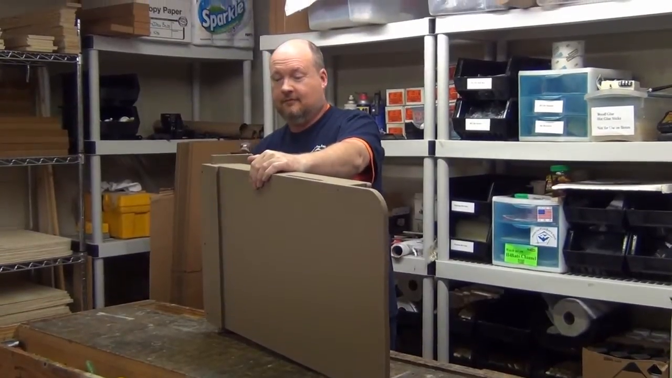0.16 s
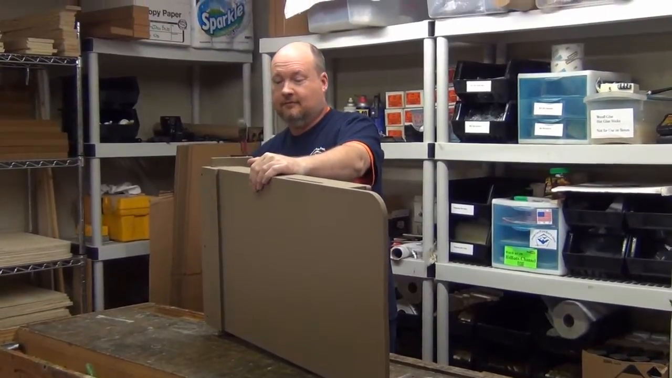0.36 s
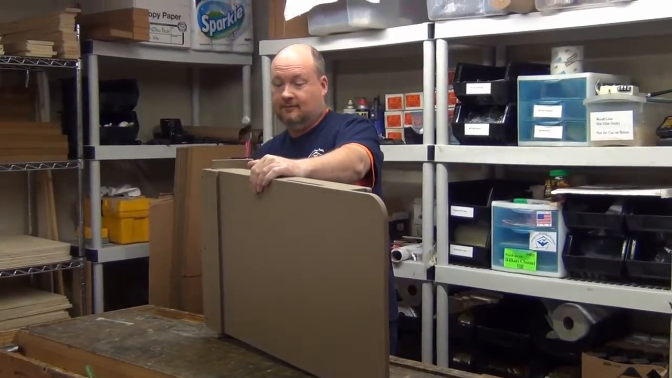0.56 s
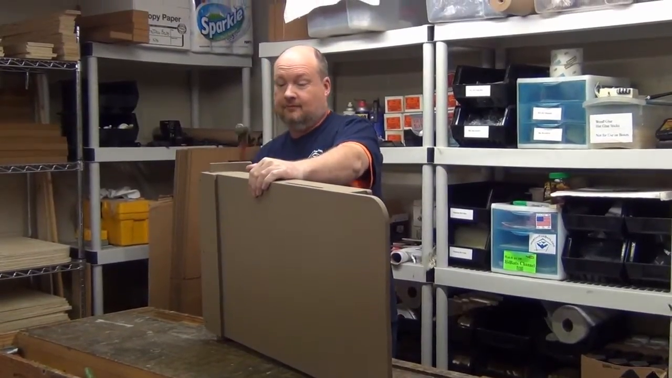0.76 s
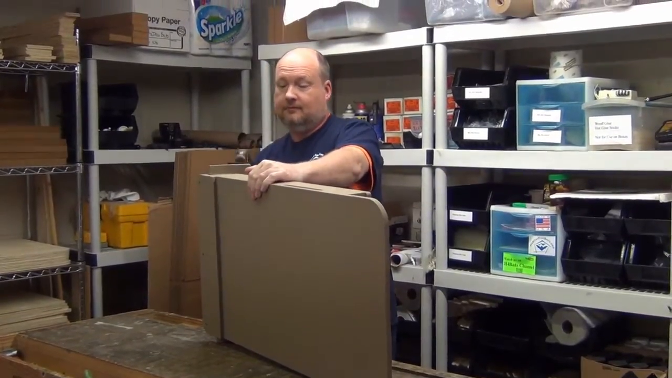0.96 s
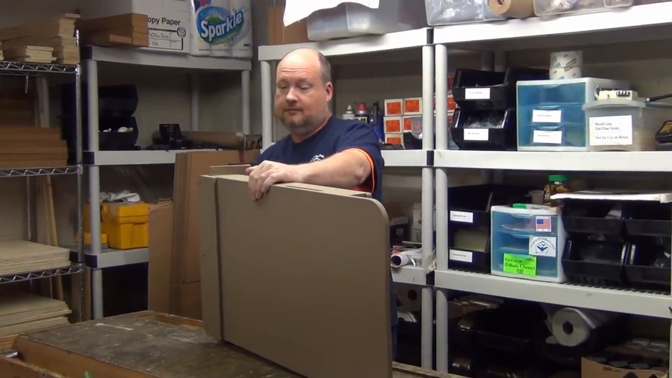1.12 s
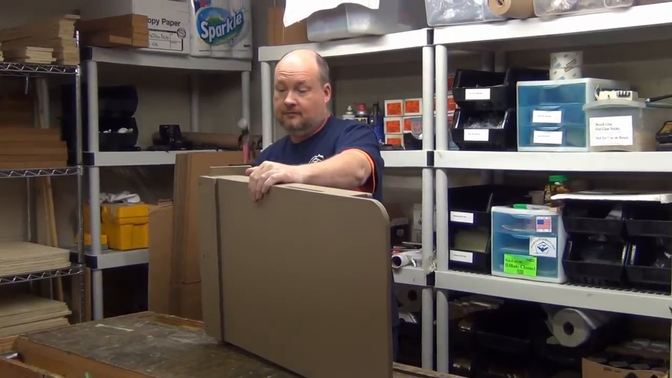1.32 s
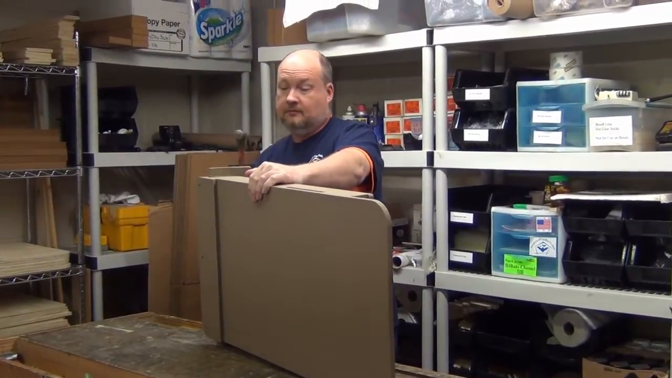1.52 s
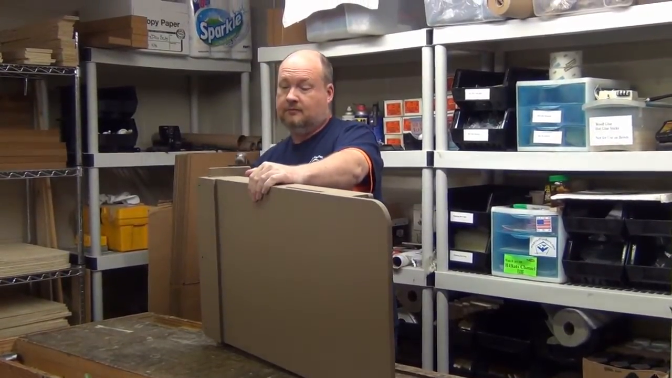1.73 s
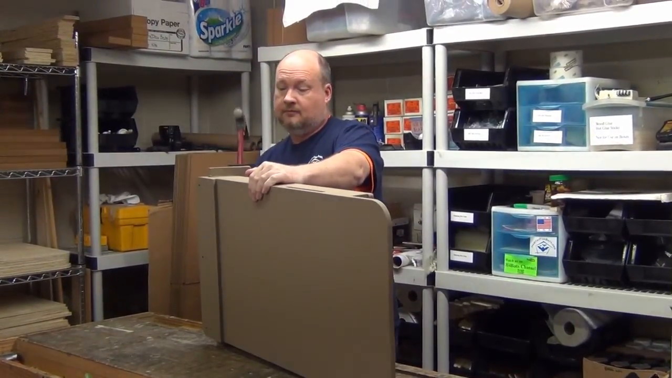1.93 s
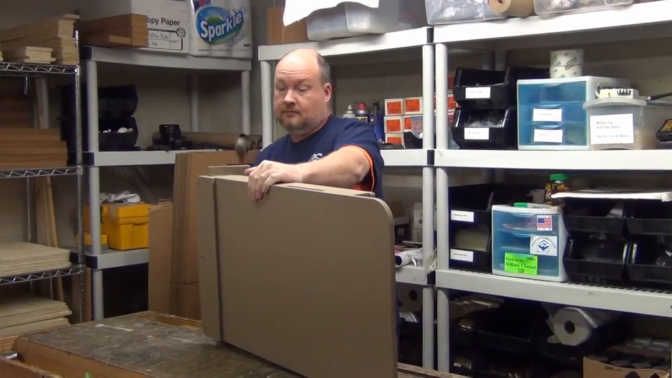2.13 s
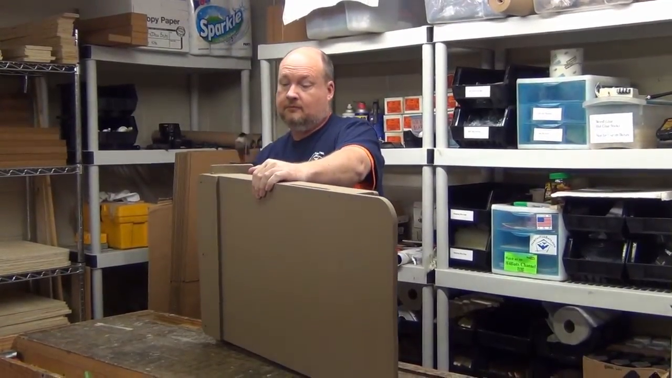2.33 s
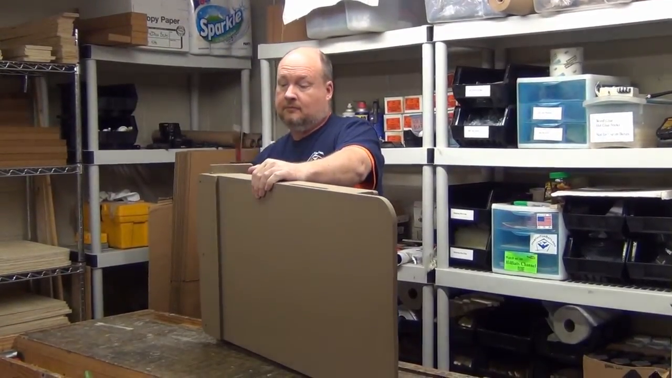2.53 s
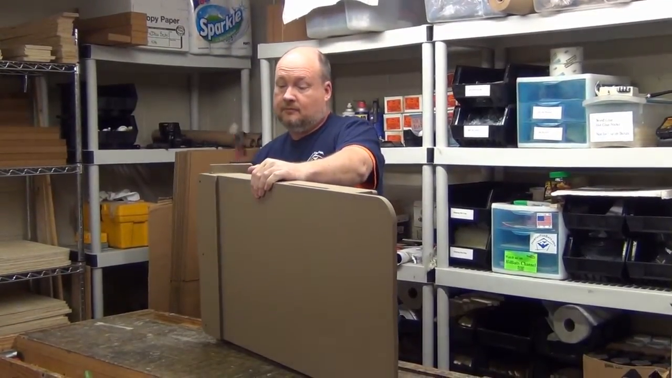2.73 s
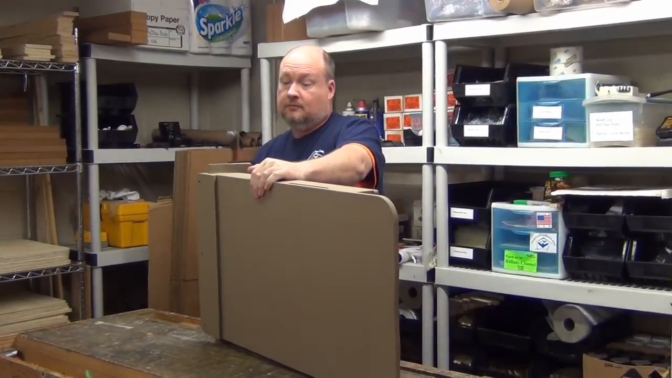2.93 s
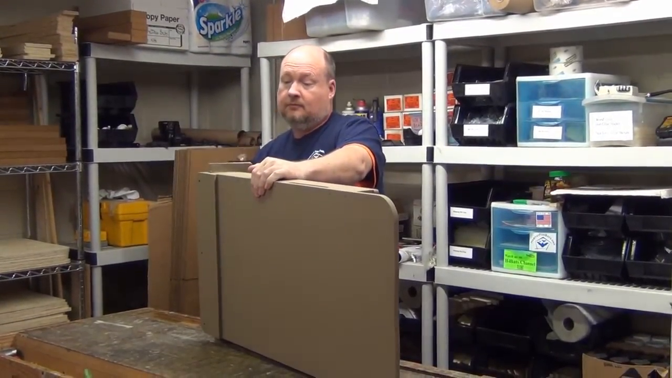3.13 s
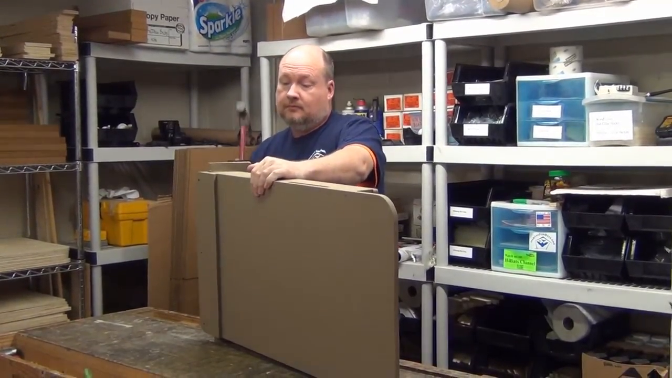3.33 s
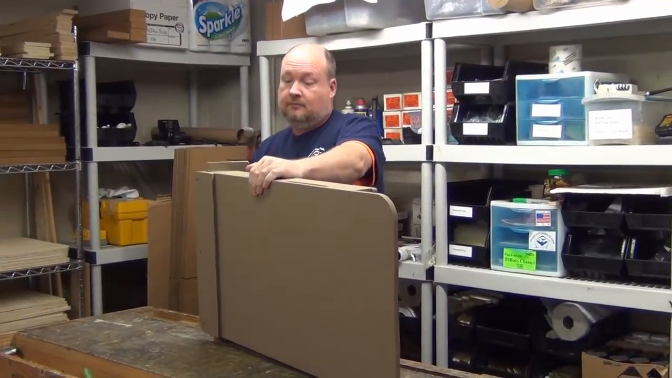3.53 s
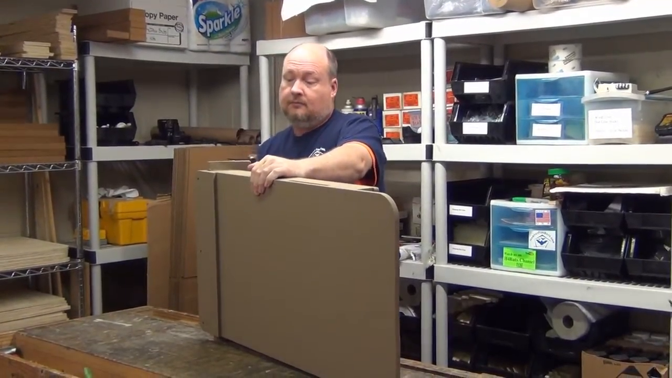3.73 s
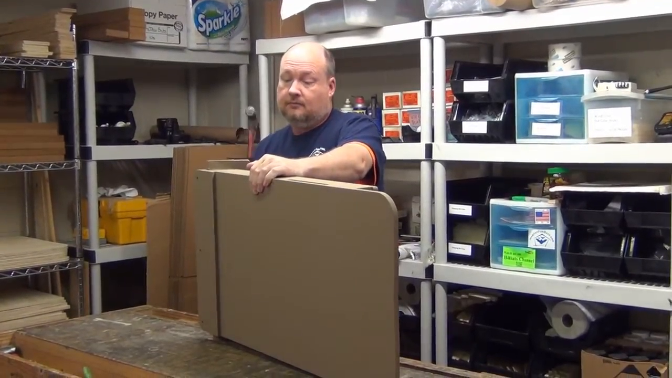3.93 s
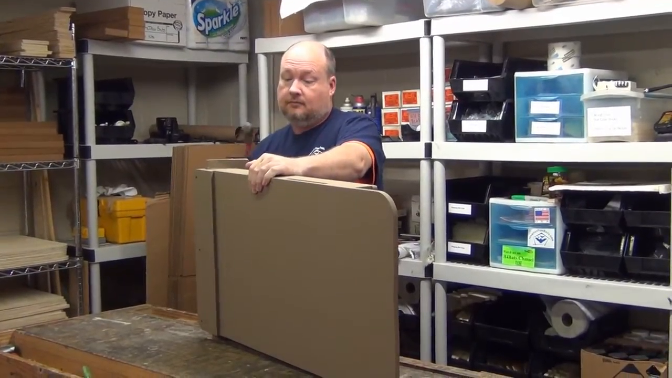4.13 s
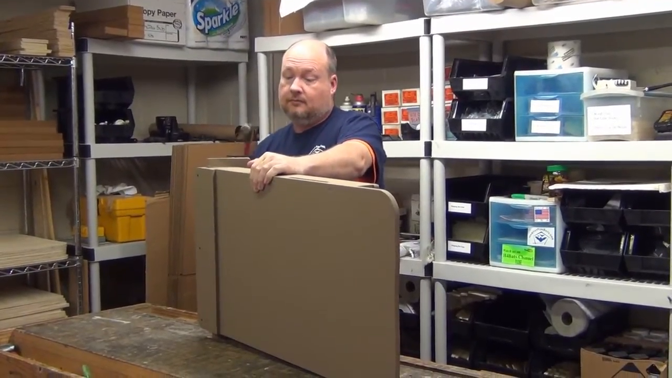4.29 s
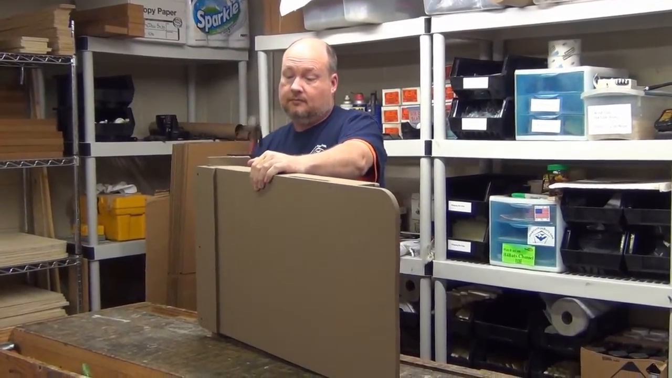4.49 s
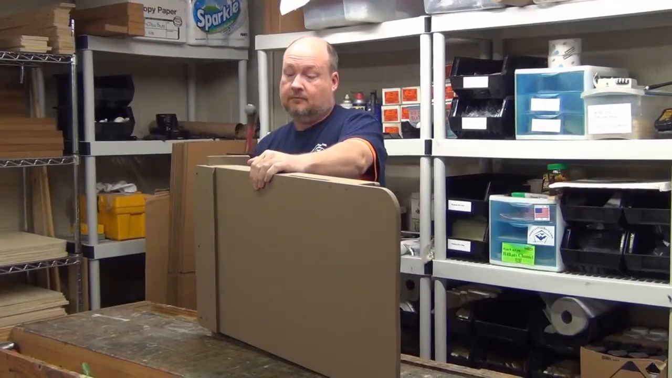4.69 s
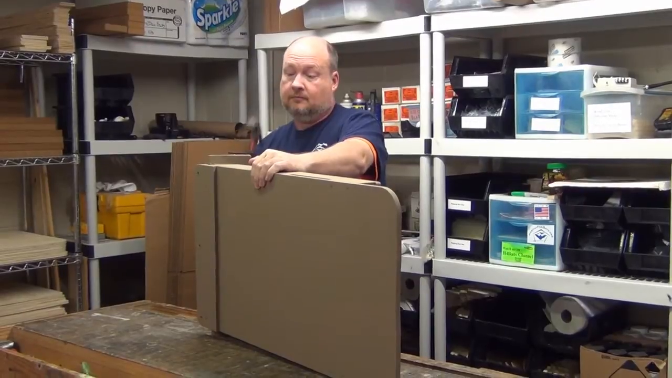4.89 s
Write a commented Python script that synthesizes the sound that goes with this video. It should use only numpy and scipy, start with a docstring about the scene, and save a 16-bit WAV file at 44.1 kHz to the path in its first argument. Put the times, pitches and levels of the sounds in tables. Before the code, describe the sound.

A hammer strikes a hollow wooden box on a workbench in steady loud knocks, with loose hardware jingling and bits ticking between blows.

```python
"""Small, full workshop: a hammer strikes a hollow wooden box standing on a workbench.
Each blow is a crack and knock, decaying box modes, a low thud and diffuse noise for bench and room.
Shaken hardware jingles and lands as ringing noise, a loose block rocks as short tones, grit ticks down.
A camera listens: its limiter flattens the blows, its focus motor chirps once a frame while it runs.
Ventilation wash, wavering hums and a thin throbbing whine lie beneath."""
import sys
import numpy as np
from scipy import signal
from scipy.io import wavfile
from scipy.ndimage import uniform_filter1d, minimum_filter1d

SR = 44100
rng = np.random.default_rng(int(sys.argv[2]) if len(sys.argv) > 2 else 0)


def amplitude_ratio(level_db):
    """Convert a level in decibels to the matching linear amplitude (field) ratio."""
    exponent = np.asarray(level_db, float) / 20
    return 10 ** exponent


def wav_out(sig):
    """Save sig, one row per channel (or a flat mono array), as 16-bit PCM at SR to the path in sys.argv[1]."""
    wavfile.write(sys.argv[1], SR, np.round(np.clip(np.atleast_2d(sig).T, -1, 1) * 32767).astype(np.int16))


N = 222873

# Left-right likeness of the struck sounds. Each row: frequency in Hz, likeness 0-1.
BLOW_LIKENESS = [(60, 0.3), (180, 1), (550, .98), (1650, 0.98), (2800, 1), (4970, 0.91), (15000, 0.82)]
# Left-right balance. Each row: frequency in Hz, left minus right in dB.
BALANCE = [(60, -3), (240, -1.6), (950, -1.1), (3770, -.8), (15000, 0)]


def evened(x):
    """Scales to rms 1."""
    return x / np.sqrt(np.mean(x ** 2) + 1e-20)


def read(points, hz):
    """Looks a table up on a log-frequency axis."""
    f, value = np.transpose(points)
    return np.interp(np.log(hz + 1), np.log(f + 1), value)


def add(mix, start_s, sound):
    """Mixes a sound in at start_s, trimmed to the mix."""
    at = round(start_s * SR)
    part = mix[..., max(at, 0):max(at + sound.shape[-1], 0)]
    part += sound[..., max(-at, 0):][..., :part.shape[-1]]


def noise(seconds, shape, likeness, size=256):
    """Two-channel noise whose short-time magnitude is shape(hz, t)."""
    hop = size // 4
    frames = int(seconds * SR) * 4 // size + 5
    hz = np.fft.rfftfreq(size, 1 / SR)[:, None]
    t = np.arange(frames) * hop / SR
    a, b, c, d = rng.standard_normal((frames, len(hz), 4)).T
    side_gain = np.sqrt((1 - np.clip(read(likeness, hz), 0, 1)) / 2)
    mid = np.sqrt(1 - side_gain ** 2) * (a + 1j * b)
    side = side_gain * (c + 1j * d)
    lean = amplitude_ratio(read(BALANCE, hz) / 2)
    z = np.array([(mid + side) * lean, (mid - side) / lean]) * shape(hz, t)
    return signal.istft(z, nperseg=size, noverlap=size - hop)[1][:, :int(seconds * SR)]


def burst(colour, t60_s, rise_ms, seconds):
    """Puff of coloured noise with exponential rise and decay."""
    t = np.arange(int(seconds * SR)) / SR
    puff = evened(noise(seconds, lambda hz, _: amplitude_ratio(read(colour, hz)), BLOW_LIKENESS))
    return puff * (1 - np.exp(-t * 1000 / rise_ms)) * amplitude_ratio(-60 * t / t60_s)


def uneven_time(count, depth, size):
    """Time in seconds that runs at a randomly wavering rate, so a tone on it wavers in pitch."""
    waver = evened(uniform_filter1d(rng.standard_normal(count), size=size))
    return np.cumsum(1 + depth * waver) / SR


def chatter(sound, depth_db):
    """Loose parts touch in quick clumps: a lumpy gain."""
    lumps = evened(uniform_filter1d(rng.standard_normal(sound.shape[1]), size=110))
    return sound * amplitude_ratio(depth_db * lumps)


def ringing(sound, ring_db):
    """Adds the modes of the loose hardware, as resonators, to whatever shakes it."""
    # Each row: frequency in Hz, relative level in dB, t60 in seconds (resonators use at least 0.01).
    hardware_modes = [(1512, -6, 0.069), (1770, -2, 0.17), (2180, -0.5, 0.18), (2824, -1.5, 0.076),
                      (3570, 1, 0.099), (4280, 0.5, .1), (5650, 8, 0.13), (6100, 2, 0.046),
                      (6800, -2, 0.12), (7006, 1.5, 0.032), (7330, -1, 0.057), (7700, 3.5, 0.087),
                      (8300, 2, 0.043), (8460, -5.5, 0.047), (8700, -4, 0.048)]
    out = sound.copy()
    for hz, db, t60_s in hardware_modes:
        resonator = signal.iirpeak(hz, hz * max(t60_s, .01) / 2.6, SR)
        out += amplitude_ratio(ring_db + db) * signal.lfilter(*resonator, sound)
    return out


def air_wash():
    """Ventilation wash and microphone hiss: coloured noise at a slowly moving level."""
    # Colour. Each row: frequency in Hz, relative density in dB per Hz.
    colour = [(25, -32), (42, -39), (60, -12.5), (100, -20), (150, -10.5), (300, -10), (430, -17.5),
              (650, -18.5), (800, -19.5), (1060, -19), (2080, -25.5), (4000, -28.5), (7790, -27),
              (10000, -32), (15500, -39), (16500, -50)]
    # Each row: time in seconds, level in dB.
    level_points = [(0, -55), (1.4, -56), (2.1, -56), (2.7, -58), (5.05, -53.5)]
    # Each row: frequency in Hz, left-right likeness 0-1.
    likeness = [(60, 0.43), (180, 0.79), (550, 0.83), (1650, 0.99), (4970, 0.96), (15000, 0.66)]
    wash = noise(N / SR + .1, lambda hz, _: amplitude_ratio(read(colour, hz)), likeness, size=2048)[:, :N]
    return evened(wash) * amplitude_ratio(np.interp(np.arange(N) / SR, *np.transpose(level_points)))


def hums():
    """Steady phasors plus narrow-band noise: hums that waver in level and phase."""
    # Each row: frequency in Hz, noise width in Hz, level in dB until 1.6 s, level in dB from 2.2 s.
    hum_rows = [(59.5, 2, -73, -72), (120, 3, -60, -71), (178, 3, -67, -65), (241, 4, -70, -68),
                (360, 4, -67, -66), (382, 4, -68, -73), (481, 4, -70, -70), (1052, 30, -71, -70)]
    t, out = np.arange(N) / SR, np.zeros(N)
    for hz, width_hz, early_db, late_db in hum_rows:
        pole = np.exp(-np.pi * width_hz / SR)
        drift = signal.lfilter([1], [1, -pole], rng.standard_normal((2, N)))
        phasor = 4.3 + evened(drift[0]) + 1j * evened(drift[1])
        tone = phasor * np.exp(2j * np.pi * hz * t)
        out += evened(tone.real) * amplitude_ratio(np.interp(t, [1.6, 2.2], [early_db, late_db]))
    return out


def whine():
    """Thin high sine whose level throbs."""
    # Frequency in Hz, rms level in dB before the throb.
    hz, rms_db = (15735, -73)
    throb_hz, throb_depth = 13.1, .6
    t = np.arange(N) / SR
    throb = 1 + throb_depth * np.sin(2 * np.pi * throb_hz * t - 1.6)
    return np.sqrt(2) * amplitude_ratio(rms_db) * np.sin(2 * np.pi * hz * t) * throb


def focus_motor():
    """Motor steps sound as two uneven tones, in one short swell per picture frame."""
    # Each row: start in seconds, end in seconds, lower tone in Hz, lower level in dB, upper level in dB.
    runs = [(0, 1.75, 2910, -60, -67), (3.15, 3.5, 3180, -65, -65), (3.5, 5.1, 3115, -66, -65)]
    frames_per_s, upper_offset_hz = 30000 / 1001, 1545
    t, out = np.arange(N) / SR, np.zeros(N)
    frame = t * frames_per_s + .17
    swell = np.sin(np.pi * np.clip(frame % 1 / .38, 0, 1))  # first 38 % of each frame
    frame_gain = amplitude_ratio(0.5 * rng.standard_normal(400)[frame.astype(int)])
    turns = 2 * np.pi * uneven_time(N, .008, 90)  # steps are not quite regular
    for start_s, end_s, hz, low_db, high_db in runs:
        tones = amplitude_ratio(low_db) * np.sin(hz * turns) + amplitude_ratio(high_db) * np.sin((hz + upper_offset_hz) * turns)
        out += (t >= start_s) * (t < end_s) * tones
    return np.sqrt(2) * swell * frame_gain * out


def grit():
    """Grains tick onto the bench: a two-tone click, a puff around its pitch, a faint room tail."""
    # Each row: start in seconds, level in dB, pitch in Hz, dull part in dB.
    ticks = [(0.1365, -41, 7700, -22), (0.3387, -41, 9250, -22), (0.5848, -33.5, 4800, 3),
             (0.5863, -36.5, 3000, 10), (0.982, -28.5, 8900, -24), (0.9997, -24, 9040, -10),
             (1.0033, -38, 9700, -22), (1.0085, -38, 8600, -22), (1.0322, -34, 8900, -22),
             (1.096, -36, 9000, -11), (1.1725, -45, 8730, -29), (1.2002, -42, 8700, -25),
             (1.275, -42.5, 8670, -17), (1.338, -51, 8500, -20), (1.76, -25.5, 8700, -20),
             (1.793, -22.5, 9000, -14), (1.8843, -39, 8700, -22), (1.9513, -33.5, 9200, -40),
             (1.9963, -40.5, 7550, -25), (2.0532, -39, 9500, -19), (3.8097, -53, 9500, -22),
             (3.8324, -32.5, 9400, -27), (3.8756, -36, 8700, -26), (3.889, -36.5, 8550, -21),
             (3.9662, -39, 9150, -22), (3.989, -59, 9000, -22), (4.007, -50, 9500, -22),
             (4.0477, -45.5, 9000, -18), (4.446, -26, 8750, -10), (4.4645, -32, 8600, -20),
             (4.4539, -23, 9150, -11), (4.5506, -32.5, 8700, -27), (4.79, -42, 10500, -22),
             (4.891, -41, 9200, -24)]
    # Two tones of a grain, as multiples of its pitch.
    pair = (.9, 1.12)
    dust_count, pan_db = 14, 1.5  # dust: faint grains at random moments
    dust = [(u * N / SR, -50.5 + 6 * v, 7520 + 1600 * w, -20) for u, v, w in rng.random((dust_count, 3))]
    pan = amplitude_ratio([[pan_db / 2], [-pan_db / 2]])
    out, t = np.zeros((2, N)), np.arange(int(.2 * SR)) / SR
    envelope = amplitude_ratio(-60 * t / .0028) * (1 - np.exp(-t / .00022)) ** 2
    for start_s, db, hz, dull_db in ticks + dust:
        click = sum(np.sin(2 * np.pi * hz * k * t) for k in pair) * envelope
        around = [(300, dull_db - 6), (hz / 2, dull_db), (hz * .8, -3), (hz, 0), (hz * 1.2, -4),
                  (hz * 1.45, -18), (SR / 2, -36)]
        add(out, start_s, amplitude_ratio(db) * pan * click / click.max())
        add(out, start_s, amplitude_ratio(db - 13) * burst(around, .012, .3, .02))
        add(out, start_s + 0.0014, amplitude_ratio(db - 24.5) * burst(around, 0.27, 0.3, .3))  # the room answers
    return out


def rocking_block():
    """A loose wooden block rocks over: each edge lands as a wavering decaying tone and a scuff."""
    # Each row: start in seconds, first edge in dB, second edge in dB, settling in dB.
    rocks = [(0.156, -41.5, -52, -62), (0.244, -41.5, -59, -51), (1.069, -43.5, -54, -58),
             (1.759, -37, -40, -51), (1.863, -40, -53, -65), (2.469, -36, -35, -48), (3.139, -37, -37, -48),
             (3.776, -38, -38, -49), (3.944, -43, -67, -64), (4.901, -37, -38.5, -55)]
    # First edge, second edge, second edge again. Each row: frequency in Hz, t60 in s, delay in s.
    edges = [(1055, .05, 0), (843, .06, .033), (843, .05, .078)]
    scuff_colour = [(400, -12), (800, 17), (1800, -20), (3500, -17)]  # Hz, dB per Hz
    out, t = np.zeros((2, N)), np.arange(int(.2 * SR)) / SR
    for start_s, *edges_db in rocks:
        for db, (hz, t60_s, delay_s) in zip(edges_db, edges):
            envelope = amplitude_ratio(db - 60 * t / t60_s) * (1 - np.exp(-t / 0.0039))
            tone = np.sin(2 * np.pi * hz * uneven_time(len(t), .045, 150))
            add(out, start_s + delay_s, envelope * tone)
            add(out, start_s + delay_s, amplitude_ratio(db - 13.0) * burst(scuff_colour, 0.14, 4.2, .15))
    return out


def landing_hardware():
    """Hardware that the blows threw up lands: clumpy noise bursts ring its modes."""
    # Each row: start in seconds, peak level in dB.
    landings = [(0.093, -56), (1.7582, -35.5), (2.4652, -31), (2.5228, -41.5), (2.7713, -45.5),
                (3.017, -32), (3.135, -29), (3.303, -47.5), (3.7745, -34.5), (3.948, -49), (4.39, -34.5),
                (4.901, -36)]
    # Each row: frequency in Hz, relative density in dB per Hz.
    colour = [(100, -45), (400, -20), (750, -3), (1080, -3), (1520, 0), (2520, -11), (5180, -21),
              (6900, -7), (8050, -2), (9500, -10), (15000, -44)]
    out = np.zeros((2, N))
    for start_s, peak_db in landings:
        impact = burst(colour, .26, 1.5, .3) + burst(colour, .025, .5, .3)
        clatter = ringing(chatter(impact, 4), 9)
        add(out, start_s, amplitude_ratio(peak_db) * clatter / abs(clatter).max())
    return out


def shock():
    """The blow's shock through bench and floor: a short dull puff."""
    # Each row: frequency in Hz, relative density in dB per Hz.
    colour = [(80, -10), (220, 0), (500, -9), (900, -24), (16000, -50)]
    return amplitude_ratio(-33) * burst(colour, .06, 3.5, .03)


def thud(t):
    """The floor shakes the camera: low noise, quick rise, exponential decay."""
    # Each row: frequency in Hz, relative density in dB per Hz.
    colour = [(20, -15), (40, -20), (60, -13), (100, -12), (200, -69)]
    rumble = noise((len(t) + .5) / SR, lambda f, _: amplitude_ratio(read(colour, f)), [(20, 0.2), (100, 0.88)], size=4096)
    return amplitude_ratio(-30.5) * evened(rumble) * (1 - np.exp(-t / 0.0026)) * amplitude_ratio(-60 * t / 0.41)


def shaken_hardware(t, tilt_db):
    """Hardware jingles on the bench, more for brighter blows: clumpy noise through its modes."""
    # Each row: frequency in Hz, relative density in dB per Hz.
    colour = [(3000, -6.5), (5000, -10), (6000, -7), (7900, -1.5), (9200, -6), (12000, -21.5), (16000, -39)]
    jingle = chatter(burst(colour, 0.3, 21.7, (len(t) + .5) / SR), 0.71)
    return amplitude_ratio(-20.5 + 3.9 * tilt_db) * ringing(jingle, 4.8)


def roar(t, tilt_db):
    """Uneven diffuse sound of bench and room: noise with rise and decay by band."""
    # Each row: frequency in Hz, relative density in dB per Hz.
    colour = [(40, -45), (150, -30), (300, 3), (490, -13.5), (700, -12.5), (1000, -18), (1460, -21.5),
              (2410, -26.5), (3870, -35), (5100, -35), (7800, -30.5), (10000, -40.5), (15700, -60)]
    # Each row: frequency in Hz, t60 in seconds.
    decay = [(100, 0.5), (260, 0.3), (700, 0.29), (1840, 0.28), (4850, 0.31), (12800, 0.15)]
    # Each row: frequency in Hz, rise time constant in ms.
    onset = [(100, 3.1), (500, 12), (2000, 2.2), (9000, 3.6)]

    def diffuse(f, s):
        """Colour, rise and decay by band, with lumps where reflections bunch up."""
        lumps = uniform_filter1d(rng.standard_normal((len(f), len(s))), size=5, axis=0)
        lumps_db = 1.4 * evened(uniform_filter1d(lumps, size=7, axis=1))
        rise = 1 - np.exp(-s * 1000 / read(onset, f))
        low_cut = 1 / (1 + (420 / (f + 1)) ** 4)  # the low range belongs to single modes
        colour_db = read(colour, f) + tilt_db * np.log2(1 + f / 500)
        return rise * low_cut * amplitude_ratio(colour_db - 60 * s / read(decay, f) + lumps_db)

    field = noise((len(t) + .5) / SR, diffuse, BLOW_LIKENESS, size=512)
    return amplitude_ratio(-2) * chatter(field, 1.54) * (1 - np.exp(-t / 0.0085))


def box_modes(t, place):
    """The box rings as decaying sines; which modes answer depends on where the hammer lands."""
    # Each row: frequency in Hz, relative level in dB struck at the near end, in the middle,
    # at the far end, t60 in seconds.
    modes_table = [(66.9, -32.5, -41, -29.5, 0.65), (71.6, -38, -22, -5.5, 0.15),
                   (105.1, -18, -16, -22.5, 0.36), (121.2, -13, -6, -6, 0.29),
                   (142.7, -15.5, -7.5, -5.5, 0.36), (166.84, -11, 1.5, -8.5, 0.35),
                   (194.4, -11, -12.5, -5, 0.37), (205.4, -8.5, -1, -3, 0.34),
                   (242.3, -2.5, -2.5, 4.5, 0.22), (260.7, -2.5, 1.5, -8.5, 0.32),
                   (299.7, -1.5, -2, -5.5, 0.31), (332, -8, -6, -7, 0.31), (369.7, -7, -6.5, -4, 0.26),
                   (390, -14, -5.5, -9.5, 0.31), (433.4, -13.5, -11, -21, 0.28),
                   (469.4, -11, -18, -4.5, 0.22), (497.5, -25, -15.5, -18, 0.37),
                   (536.5, -14, -19.5, -16.5, 0.31), (591.6, -22, -19, -14, 0.33),
                   (639, -9.5, -26, -23, 0.22), (655, -16, -12, -14, 0.28), (698, -8, -33, -9.5, 0.3),
                   (838, -20.5, -19.5, -52, 0.36), (907, -10, -9, -8, 0.13), (998, -6.5, -10.5, -41, 0.18),
                   (1257, -26, -35, -15, 0.34)]
    swell_db, side_db = 2, -16.5
    hz, near_db, middle_db, far_db, t60_s = np.transpose(modes_table)[:, :, None]
    u = 2 * np.clip(place, 0, 1)
    db = middle_db + max(1 - u, 0) * (near_db - middle_db) + max(u - 1, 0) * (far_db - middle_db)
    sign = (-1) ** np.arange(len(hz))[:, None]
    # each mode reaches the two microphone ports a little differently
    side = amplitude_ratio(side_db) * np.exp(2j * np.pi * rng.random((len(hz), 1)))
    lean = amplitude_ratio(read(BALANCE, hz) / 2)
    ports = np.array([(1 + side) * lean, (1 - side) / lean])
    modes = sign * amplitude_ratio(db - 60 * t / t60_s) * np.exp(2j * np.pi * hz * t)
    modes *= (1 - np.exp(-t / 0.0045)) ** 5  # the panels need a few cycles to swing up
    # modes swell and sink as box, bench and room trade energy
    swell_phase = rng.uniform(3, 8, hz.shape) * t + rng.random(hz.shape)  # 3-8 rad/s
    modes *= amplitude_ratio(swell_db * np.sin(swell_phase))
    return amplitude_ratio(-5.5) * (ports * modes).imag.sum(axis=1)


def knock(t, hz, db):
    """The struck edge rings unevenly: a wavering sine that dies by 60 dB in 48 cycles."""
    envelope = amplitude_ratio(db - 60 * t * hz / 48) * (1 - np.exp(-t / 0.0032))
    return envelope * np.sin(2 * np.pi * hz * uneven_time(len(t), .17, 60))


def crack(db):
    """Steel on wood: a very short coloured noise burst."""
    # Each row: frequency in Hz, relative density in dB per Hz.
    colour = [(60, -31), (250, 15), (500, -14), (980, -0.5), (1760, -6.5), (2580, -0.5), (4710, -18.5),
              (8000, -5.5), (10500, -15), (15700, -38)]
    snap = burst(colour, 0.018, 0.8, .06)
    t = np.arange(snap.shape[1]) / SR
    return amplitude_ratio(db) * snap * (1 - np.exp(-t / 0.0015))


def blow(strength_db, crack_db, tilt_db, place, knock_hz, knock_db):
    """One hammer blow: box, roar, jingle, thud, crack and knock, scaled by its strength."""
    t = np.arange(int(.8 * SR)) / SR
    out = box_modes(t, place) + roar(t, tilt_db) + shaken_hardware(t, tilt_db) + thud(t)
    add(out, 0, crack(crack_db))
    out += knock(t, knock_hz, knock_db)
    return amplitude_ratio(strength_db) * out


def hammering():
    """All blows, each led by its shock, which arrives first."""
    # Each row: start in seconds, strength in dB, crack in dB, brightness in dB per octave (well above
    # 500 Hz), place along the edge 0-1, knock in Hz, knock in dB; crack and knock relative to strength.
    blows = [(-.125, 5.5, -10, 0.8, 0.08, 950, -12), (0.7035, 8, -4.5, 0.5, 0.09, 934, -10.5),
             (1.470, 8.5, -13, -0.76, 0.26, 1024, -8), (2.177, 6.5, -9, -0.23, 0.34, 960, -10),
             (2.8448, 5, -10, 0.24, 0.5, 858, -14), (3.4927, 1.5, -8, 2, 0.63, 850, -22),
             (4.1169, -1, -9, 1.71, 0.98, 1165, -8.5), (4.6258, 1, -6, 1.03, 0.95, 2395, 0),
             (5.021, 1, -4, 2, 0.4, 997, -7)]
    shock_lead_s = .007
    out = np.zeros((2, N))
    for start_s, *how in blows:
        add(out, start_s, blow(*how))
        add(out, start_s - shock_lead_s, shock())
    return out


def scene():
    """All sources together."""
    loose_things = landing_hardware() + rocking_block() + grit()
    background = focus_motor() + air_wash() + hums() + whine()
    return loose_things + background + hammering()


def band_limit(x):
    """A steep low-pass at the top of the band."""
    return signal.sosfilt(signal.butter(12, 15850, fs=SR, output="sos"), x)


def record(dry):
    """The microphone drops the deep bass; a limiter rides the peak level and lets go quickly."""
    threshold_db, release_db_per_s, share = -5.0, 400., .9  # share of the excess taken away
    dry = signal.sosfilt(signal.butter(2, 45, "high", fs=SR, output="sos"), dry)
    level_db = 20 * np.log10(abs(dry).max(0) + 1e-9)
    peak_db = -minimum_filter1d(-level_db, size=485)  # running maximum over 11 ms
    fall_db = np.arange(N) * release_db_per_s / SR
    held_db = np.maximum.accumulate(peak_db + fall_db) - fall_db
    over_db = np.maximum(held_db - threshold_db, 0)
    limited = dry / amplitude_ratio(share * uniform_filter1d(over_db, size=301))
    return band_limit(limited)


dry = scene()
out = record(dry)
wav_out(out)
```